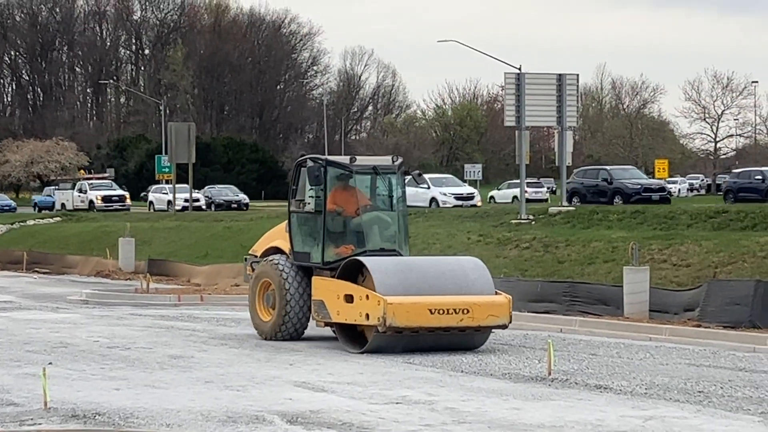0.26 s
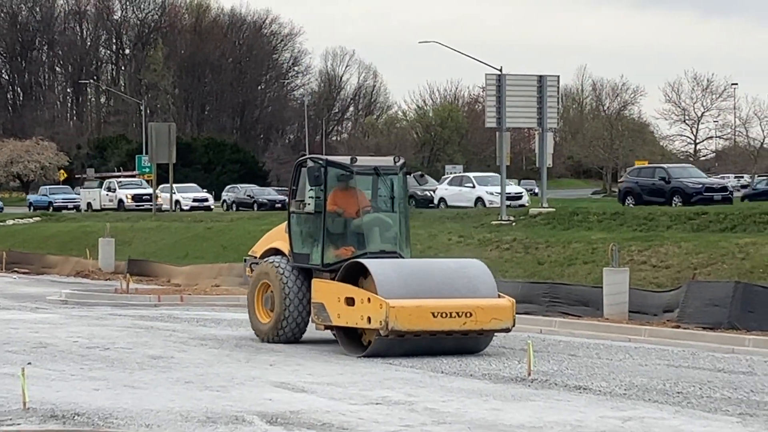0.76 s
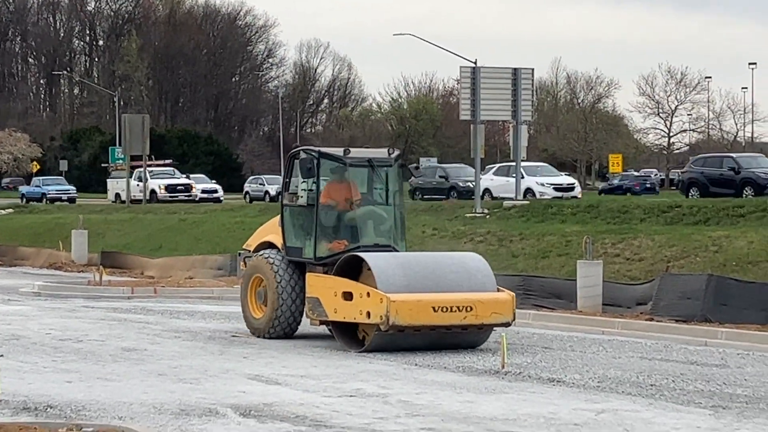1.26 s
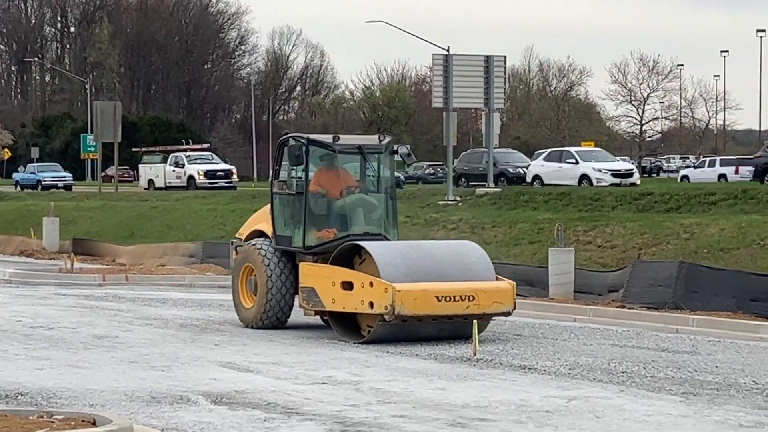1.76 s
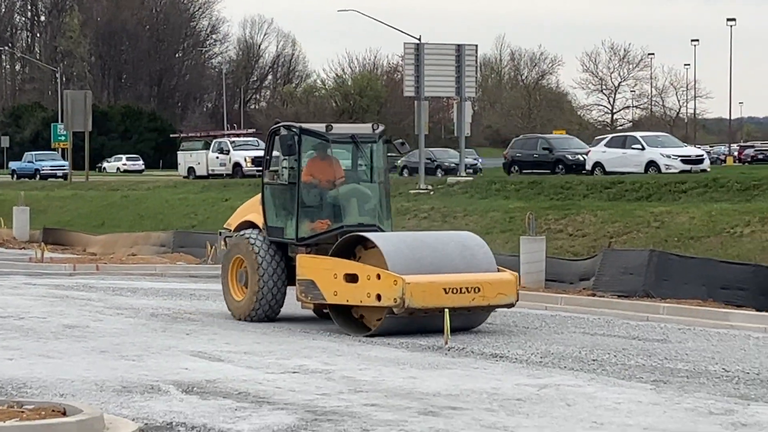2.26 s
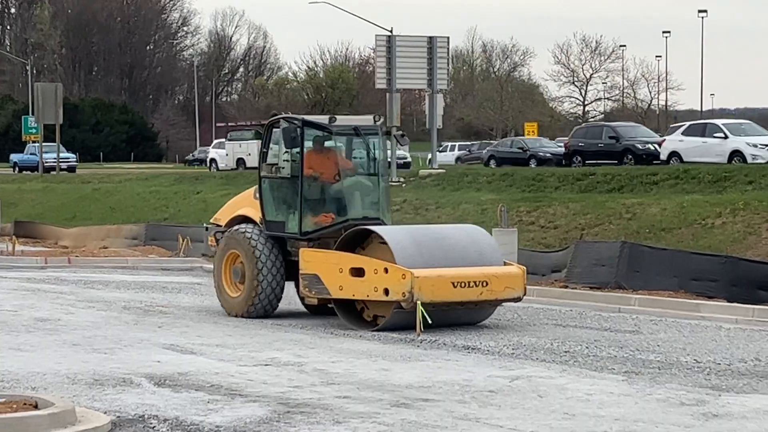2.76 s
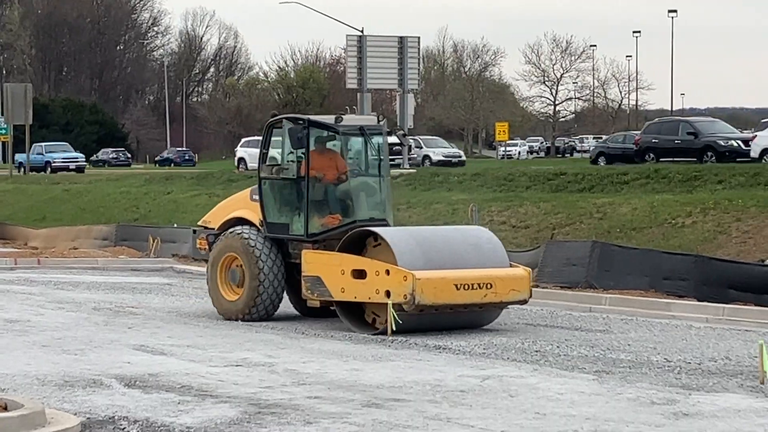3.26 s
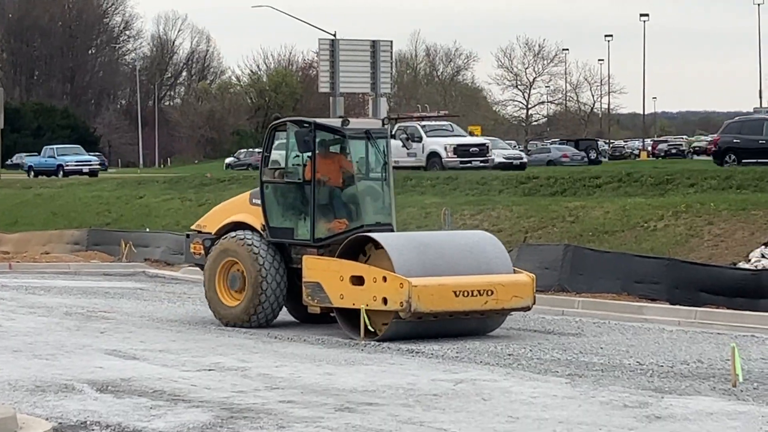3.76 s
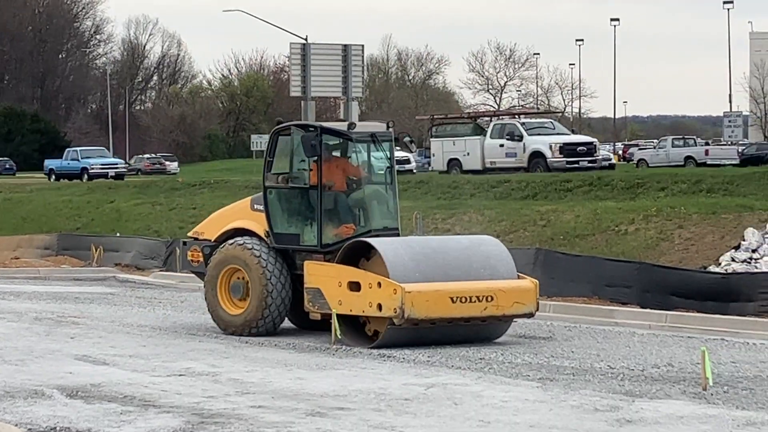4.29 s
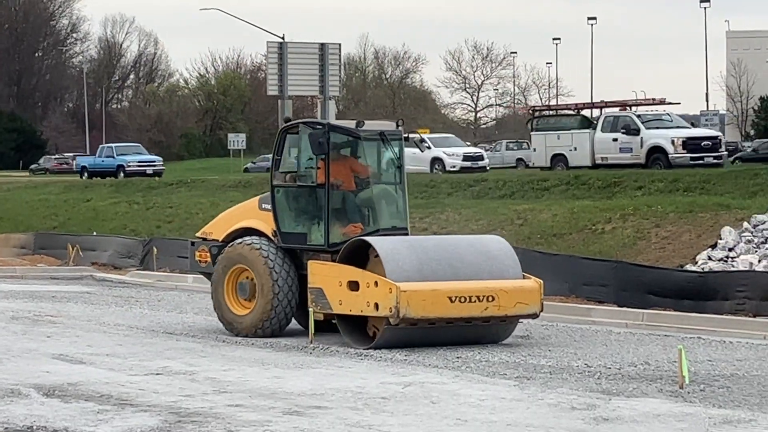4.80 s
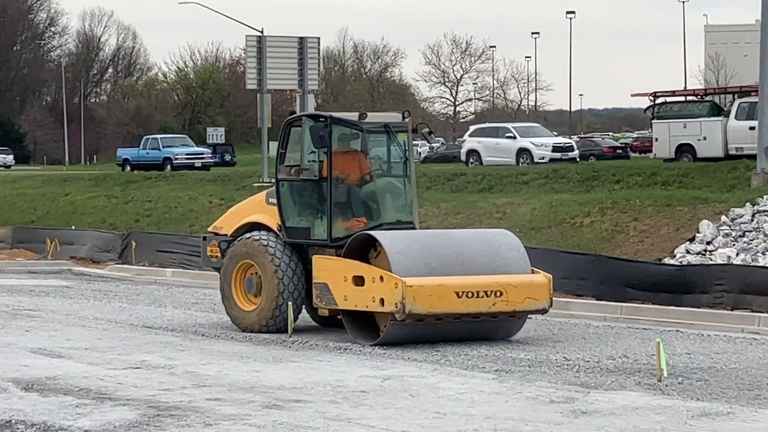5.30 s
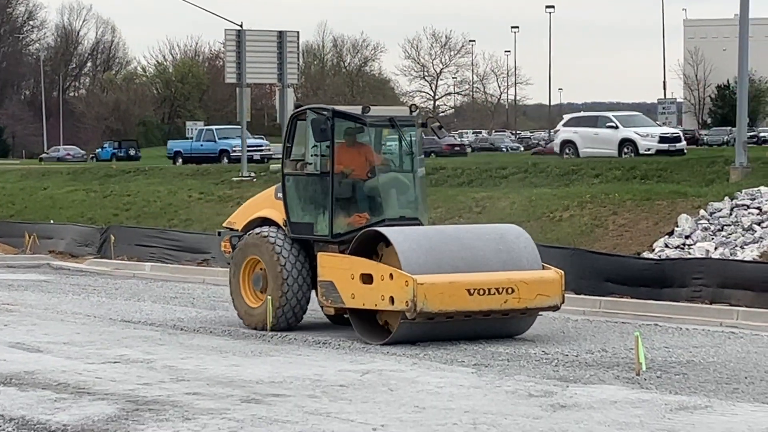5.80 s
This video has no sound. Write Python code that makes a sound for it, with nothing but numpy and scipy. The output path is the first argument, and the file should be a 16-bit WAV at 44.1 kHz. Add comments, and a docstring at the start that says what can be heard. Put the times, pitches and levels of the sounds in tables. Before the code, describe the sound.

A heavy road roller's diesel engine throbs and drones with a growing whine as its drum crunches slowly over gravel beside low traffic rumble.

```python
"""Vibrating road roller on gravel

A road roller creeps closer across an open site with traffic behind it. Sines at geared multiples of one
shaft speed make its vibrator, pump and gears; shaped noise makes rumble, roar and crushed gravel.
Struck resonances make panel rattle and engine pings; short noise bursts make cracking stones.
Two close microphone ports hear it with a phase shift between them."""
import sys
import numpy as np
from scipy import signal
from scipy.fft import rfft, irfft, next_fast_len
from scipy.io import wavfile
from scipy.ndimage import uniform_filter1d

SR = 44100
rng = np.random.default_rng(int(sys.argv[2]) if len(sys.argv) > 2 else 0)


def int16_out(signal):
    """Quantize to a 16-bit WAV file."""
    q = np.round(np.clip(np.atleast_2d(signal).T, -1, 1) * 32767)
    wavfile.write(sys.argv[1], SR, q.astype(np.int16))


N = 266364
T_S = np.arange(N) / SR
SIZE = next_fast_len(N)
HZ = np.maximum(np.arange(SIZE // 2 + 1) * SR / SIZE, 1)

# engine block and fan spectrum: f/Hz, relative density/dB
ENGINE_COLOUR = [(250, -3), (340, -2), (468, 1.5), (516, 0.5), (691, -1.5), (804, -1), (1080, -3),
                 (1320, -6.5), (1460, -6), (1770, -10.5), (2230, -16), (2480, -11.5), (4000, -25),
                 (5200, -31.5), (8800, -100)]


def from_db(db):
    """Decibels to gain."""
    return 10 ** (np.asarray(db) / 20)


def rms_one(x):
    """Scale to unit rms."""
    return x / np.sqrt(np.mean(x ** 2) + 1e-20)


def in_time(rows):
    """Columns of a curve table, one value per sample."""
    s, *columns = np.transpose(rows)
    return [np.interp(T_S, s, c) for c in columns]


def at_hz(points):
    """A spectrum table read at every bin, linear in log frequency."""
    hz, value = np.transpose(points)
    return np.interp(np.log(HZ), np.log(np.maximum(hz, 1)), value)


def drift(rate_hz):
    """Slow random signal of unit rms: noise through a double pole at rate_hz."""
    step = 40   # samples per slow value
    r = np.exp(-2 * np.pi * rate_hz * step / SR)
    noise = rng.standard_normal(N // step + 2002)
    slow = signal.lfilter([1], [1, -2 * r, r * r], noise)[2000:]   # settled part
    return np.interp(np.arange(N) / step, np.arange(len(slow)), rms_one(slow))


def tone(hz, level_db, waver_db, wander_rad, flutter_db=1.35):
    """A sine of rms level_db before its slow waver and quicker flutter; its phase wanders too."""
    phase = 2 * np.pi * (np.cumsum(hz) / SR + rng.random())
    phase += wander_rad * (drift(2.68) + 0.25 * drift(12.6))
    strength_db = level_db + waver_db * drift(3.4) + flutter_db * drift(24.5)
    return np.sqrt(2) * from_db(strength_db) * np.sin(phase)


def coloured(source, colour_db, patchy_db):
    """Colour three rows (common, left, right); each octave swells on its own and partly together."""
    spectrum, out, together = rfft(source, SIZE) * from_db(colour_db), 0, drift(0.35)
    for octave in range(5, 15):
        share = np.clip(1 - abs(np.log2(HZ) - octave), 0, 1)
        if np.max(colour_db[share > 0]) > np.max(colour_db) - 50:   # skip the weakest octaves
            band = irfft(spectrum * share, SIZE)[:, :N]
            out = out + band * from_db(patchy_db * (0.51 * together + drift(11.8)))
    return rms_one(out)


def nearness():
    """0 when far, rising to 1 as the roller draws near, then held."""
    closing_s = 5.2
    return np.clip(T_S / closing_s, 0, 1)


def drive_whine():
    """The drive whines at a fixed multiple of crank speed; returns it and the crank turns per second."""
    whine_per_turn = 7.83
    # whine, mostly growing as the roller turns toward the listener: t/s, f/Hz, level/dB
    shaft = [(0, 307.8, -37.5), (.8, 306.8, -35), (1.4, 306.7, -38), (2.2, 307.1, -36.5),
             (2.55, 306.7, -40), (2.85, 307.4, -34.5), (3.6, 308, -31), (4.05, 307.1, -27.5),
             (4.4, 308.3, -30), (4.8, 303.8, -30), (5.3, 304.8, -30), (5.8, 308.4, -33.5),
             (6.04, 308.2, -30)]
    whine_hz, whine_db = in_time(shaft)
    whine = tone(whine_hz, whine_db, waver_db=.3, wander_rad=.1, flutter_db=.5)
    return whine, whine_hz / whine_per_turn


def low_notes(turns_hz):
    """Throb and vibrator hum follow the crank; the exhaust note holds a fixed firing pitch."""
    firing_hz = 79   # four cylinders: about two firings a turn
    throb_per_turn, hum_per_turn = 1.505, 3.14
    # quick uneven flutter of the low notes: t/s, deep throb level/dB, exhaust level/dB, vibrator hum level/dB
    levels = [(0.0, -34, -44, -39), (0.08, -36, -30, -33.5), (0.57, -36, -32, -29), (0.64, -31, -47, -33.5),
              (0.76, -40, -27, -31.5), (0.94, -35, -47, -29), (1.06, -33, -34, -33.5),
              (1.18, -42, -40, -29.5), (1.63, -29, -41, -26), (2.05, -35, -36, -35), (2.1, -29, -53, -46),
              (2.17, -41, -37, -29.5), (2.25, -33, -47, -40.5), (2.56, -44, -37, -52),
              (2.96, -37, -32.5, -29), (3.03, -29, -37, -33), (3.15, -51, -27, -26.5),
              (3.21, -31, -36, -37.5), (3.35, -27, -40, -26.5), (3.41, -46, -37, -37),
              (3.52, -24.5, -29, -32.5), (3.67, -34, -29, -46), (3.82, -47, -29.5, -32.5),
              (5.0, -30, -25, -39), (5.68, -41, -35, -38), (6.04, -37, -41, -27)]
    throb_db, firing_db, hum_db = in_time(levels)
    out = tone(np.full(N, firing_hz), firing_db, waver_db=0.0, wander_rad=0.44, flutter_db=0.5)
    out += tone(throb_per_turn * turns_hz, throb_db, waver_db=0.5, wander_rad=0.31)
    out += tone(hum_per_turn * turns_hz, hum_db, waver_db=.6, wander_rad=.7, flutter_db=3.0)
    return out


def traffic_drone():
    """A low wavering sine dies away steadily and beats against the exhaust note."""
    drone_hz, start_db, fade_db_per_s = 73.6, -32.5, 3
    return tone(np.full(N, drone_hz), start_db - fade_db_per_s * T_S, waver_db=0.0, wander_rad=1.47)


def geared_tones(turns_hz):
    """Growl, hydraulic pump and gear mesh are fixed multiples of crank speed that come and go."""
    pump_per_turn = 18.04
    # t/s, growl level/dB, pump level/dB, pump overtone level/dB, gear mesh level/dB, ninth order level/dB
    levels = [(0, -46, -42, -57, -53, -64), (.35, -60, -45.5, -54, -56, -59),
              (.8, -44, -48, -50, -51.5, -54), (1.2, -45.5, -44.5, -60, -54, -53),
              (1.7, -43.5, -46.5, -54, -50, -54), (2.3, -50, -50, -50, -55, -56),
              (2.55, -46, -44, -51, -59, -38), (2.8, -47, -40.5, -50, -57, -48),
              (3.0, -51, -57, -54, -54, -56), (3.35, -43, -54, -55, -58, -47),
              (3.8, -61, -55, -52, -58, -50), (4.0, -47, -49, -46, -59, -60),
              (4.18, -40, -49, -44, -53, -51), (4.35, -39, -39.5, -49, -48, -43),
              (4.6, -42.5, -47, -40, -55, -58), (4.85, -35, -38, -45, -57, -45),
              (5.1, -45, -53, -44, -48, -47), (5.4, -59, -58, -47, -49, -46),
              (5.6, -41.5, -53, -55, -51, -45), (6.04, -48, -39, -56, -53, -43)]
    growl_db, pump_db, overtone_db, mesh_db, ninth_db = in_time(levels)
    growl = tone(11.93 * turns_hz, growl_db, waver_db=1.5, wander_rad=2.2)
    out = growl * (.6 + .8 * drift(15))   # broken up
    out += tone(pump_per_turn * turns_hz, pump_db, waver_db=.6, wander_rad=.55, flutter_db=2)
    out += tone(2 * pump_per_turn * turns_hz, overtone_db, waver_db=-0.1, wander_rad=1.2, flutter_db=2.0)
    out += tone(38.75 * turns_hz, mesh_db, waver_db=1.5, wander_rad=2.94, flutter_db=3.5)
    out += tone(9.0 * turns_hz, ninth_db, waver_db=3.0, wander_rad=1.26)
    return out


def weak_orders(turns_hz, near):
    """Weaker multiples of crank speed, slightly louder on coming near."""
    near_gain_db = 2
    # cycles per turn, far level/dB, phase wander/rad
    orders = [(1.11, -68, 1.3), (3.593, -47.5, 1.45), (3.91, -44.5, 0.72), (4.37, -47.5, 1.43),
              (5.028, -44.5, 1.55), (5.9, -45.5, 2.22), (6.92, -50, 1.35), (10.31, -50, 1.88),
              (53.3, -66.5, 3.3)]
    return sum(tone(k * turns_hz, far_db + near_gain_db * near, waver_db=2.0, wander_rad=wander_rad)
               for k, far_db, wander_rad in orders)


def travel_whirr():
    """The travel drive's gears whirr: a sine roughened into sidebands by fast random gain."""
    # t/s, f/Hz, level/dB
    course = [(0, 2500, -64), (.7, 2470, -72), (1.3, 2465, -69), (1.7, 2474, -56.5), (2.2, 2470, -57),
              (2.65, 2470, -57), (3.2, 2505, -63), (3.85, 2465, -61), (4.05, 2482, -52), (4.5, 2450, -66),
              (4.9, 2450, -52), (5.1, 2458, -57), (5.35, 2443, -49), (5.6, 2450, -61), (6.04, 2465, -66)]
    hz, level_db = in_time(course)
    return tone(hz, level_db, waver_db=1.0, wander_rad=3.47, flutter_db=2) * (.5 + .85 * drift(70))


def turbo_whistle():
    """The turbocharger whistles faintly: a high sine with a wide phase wander."""
    # t/s, f/Hz, level/dB
    course = [(0, 11650, -85), (1.0, 11850, -81), (1.7, 12100, -81), (3.0, 12000, -88), (3.8, 11700, -81),
              (4.7, 12000, -80), (5.2, 12550, -76), (6.04, 12200, -79)]
    hz, level_db = in_time(course)
    return tone(hz, level_db, waver_db=3, wander_rad=30)


def rumble(level_db, near):
    """Ground, exhaust and traffic noise throbs unevenly; its upper part grows on coming near."""
    upper_far_db, upper_gain_db = -5, 7   # tyres and ground, against the deep part
    surge_rms_db, surges_hz = 1.4, 14.5
    # f/Hz, relative density/dB
    colour = [(25, -41), (42, 1), (60, -2), (92, 0), (134, -4), (177, -6), (258, -7.5), (300, -4.5),
              (320, -12), (365, -24.5), (450, -16.5), (580, -49), (990, -120)]
    noise = from_db(level_db) * coloured(rng.standard_normal((3, N)), at_hz(colour), patchy_db=.6)
    deep = signal.sosfiltfilt(signal.butter(2, 130, fs=SR, output="sos"), noise)
    upper = from_db(upper_far_db + upper_gain_db * near) * (noise - deep)
    surge = np.sqrt(2) * np.sin(2 * np.pi * surges_hz * T_S + 1.2 * drift(4))
    return from_db(surge_rms_db * surge) * (deep + upper)


def roar(turns_hz, level_db):
    """Combustion clatter and fan noise: each firing adds a short knock of uneven strength."""
    # bonnet resonances and ground-echo dips: f/Hz, 1/e half width/Hz, level/dB
    body = [(410, 51, 5.5), (1088, 24, 3.5), (1457, 59, 1.5), (1837, 112, -5.5), (1948, 120, 4.5),
            (2240, 65, -6.5), (2530, 110, -0.5), (2657, 240, -5), (773, 40, -2), (437, 20.5, -3.5),
            (1360, 26, -1)]
    cycle = 2 * np.cumsum(turns_hz) / SR   # two firings a turn
    strength = from_db(6 * rng.standard_normal(int(cycle[-1]) + 1))[cycle.astype(int)]
    firing = 1 + .22 * strength * np.exp(-4 * (cycle % 1))
    body_db = sum(db * np.exp(-((HZ - hz) / width_hz) ** 2) for hz, width_hz, db in body)
    noise = firing * rng.standard_normal((3, N))
    return from_db(level_db) * coloured(noise, at_hz(ENGINE_COLOUR) + body_db, patchy_db=0.87)


def resonator(hz, t60_s):
    """Feedback coefficients of a two-pole mode."""
    r = from_db(-60 / (t60_s * SR))
    return [1, -2 * r * np.cos(2 * np.pi * hz / SR), r * r]


def pings(level_db):
    """Small engine parts ring: sparse taps dealt to many modes over the engine's clatter range."""
    taps_per_s, t60_s = 220, .12
    pitches_hz = np.geomspace(520, 3600, 40) * rng.uniform(.98, 1.02, 40)
    taps = rng.standard_normal(N) * (rng.random(N) < taps_per_s / SR)
    dealt, out = rng.integers(0, len(pitches_hz), N), 0
    for k, hz in enumerate(pitches_hz):
        # density per Hz to level per log-spaced mode
        mode_db = np.interp(hz, HZ, at_hz(ENGINE_COLOUR)) + 10 * np.log10(hz)
        soft = uniform_filter1d(taps * (dealt == k), size=9) + 1e-18
        out = out + from_db(mode_db) * rms_one(signal.lfilter([0, 1], resonator(hz, t60_s), soft))
    return from_db(level_db) * rms_one(out)


def rattle(swell_db):
    """Valve gear and panels rattle: bunched uneven taps and harder jolts ring a set of modes."""
    # f/Hz, rms level before the swell/dB, t60/s
    panels = [(607.5, -52, 0.11), (932, -49.5, 0.17), (1055, -56.5, 0.12), (1097, -50.5, 0.12),
              (1180, -56, 0.086), (1557, -61.5, 0.085), (1650, -59.5, 0.095), (1972, -63, 0.09),
              (2110, -63.5, 0.09), (2330, -65, .09), (2810, -65, 0.11), (3284, -63.5, 0.07)]
    # jolts: t/s, level over a usual tap/dB
    jolts = [(1.6, 12), (1.636, 11), (4.657, 11), (4.705, 6), (5.095, 13), (5.12, 11)]
    out, taps = np.zeros(N), rng.random(N) < 90 * from_db(3.0 * drift(8)) / SR
    knocks = np.zeros(N)
    for s, over_db in jolts:
        knocks[round(s * SR)] = from_db(over_db)
    for hz, level_db, t60_s in panels:
        clicks = (taps * rng.standard_normal(N) + knocks) * from_db(1.7 * drift(2.6)) + 1e-18
        ring = signal.lfilter([0, np.sin(2 * np.pi * hz / SR)], resonator(hz, t60_s), clicks)
        out += from_db(level_db) * rms_one(ring)
    return from_db(swell_db) * out


def gravel(near):
    """Crushed stones crackle densely over a hiss; the air dulls the top less when the drum is near."""
    far_db, gain_db = -53.5, 0.5
    treble_far_db, treble_gain_db = -10, 11   # top against body
    # f/Hz, relative density/dB
    colour = [(2500, -30), (3600, -2), (4000, -2), (4400, -.5), (5000, -3), (6000, -5.5), (7200, -8),
              (8600, -7), (9500, -9), (10500, -8), (12500, -11), (13200, -15), (16000, -16)]
    sizes = from_db(2.9 * np.minimum(rng.exponential(1, (3, N)), 4.8)) * rng.choice([-1, 1], (3, N))
    crackle = rms_one(sizes * (rng.random((3, N)) < 2500 * from_db(1.0 * drift(12)) / SR))
    grit = coloured(rng.standard_normal((3, N)) + .4 * crackle, at_hz(colour), patchy_db=.75)
    dull = signal.sosfiltfilt(signal.butter(1, 7000, fs=SR, output="sos"), grit)
    treble = from_db(treble_far_db + treble_gain_db * near) * (grit - dull)
    return from_db(far_db + gain_db * near) * (dull + treble)


def stones():
    """Single stones crack: each a short decaying burst of noise banded around its own pitch."""
    length_s, decay_s = 0.025, 0.02
    # t/s, level at onset/dB, f/Hz
    cracks = [(0.833, -58, 6390), (0.8513, -54, 6480), (0.8654, -55, 7500), (0.8814, -53, 6850),
              (0.9094, -57, 8000), (1.4195, -58, 11300), (1.5184, -57, 11800), (1.6466, -54, 6500),
              (1.998, -60, 9500), (3.7792, -58, 7480), (5.0693, -52, 8014)]
    out, t = np.zeros(N), np.arange(round(length_s * SR)) / SR
    grit = rng.standard_normal((len(cracks), len(t)))
    for (s, onset_db, hz), noise in zip(cracks, grit):
        band = signal.butter(2, [hz / 1.35, hz * 1.3], "band", fs=SR, output="sos")
        burst = rms_one(signal.sosfilt(band, noise)) * np.exp(-t / decay_s)
        at = round(s * SR)
        out[at:at + len(t)] += from_db(onset_db) * burst
    return out


def moans():
    """Brief low notes: slightly wavering sines under bell-shaped swells."""
    # t/s, f/Hz, level at the top of the swell/dB, 1/e half length/s
    notes = [(2.55, 168, -34, 0.12), (3.335, 470, -35.5, 0.035), (4.95, 231, -34, .1),
             (5.32, 241.5, -31, 0.062), (5.7, 270, -31, 0.098)]
    return sum(np.exp(-((T_S - s) / half_s) ** 2) * tone(np.full(N, hz), db, waver_db=1.5, wander_rad=0.46)
               for s, hz, db, half_s in notes)


def passer():
    """An exhaust note on the road fades in as its vehicle comes out from behind the roller."""
    start_s, rise_s, note_hz, level_db = 5.36, 0.085, 115.8, -27.5
    fade = np.clip((T_S - start_s) / rise_s, 0, 1)
    return fade * tone(np.full(N, note_hz), level_db, waver_db=1, wander_rad=.6, flutter_db=2.5)


def ports(common, left, right):
    """Stereo likeness by frequency: a shared part with a phase shift, plus a part independent left and right."""
    # f/Hz, phase by which left leads/rad
    port_phase = [(0, 0), (1550, 0), (1890, -.6), (2240, 0), (3300, 1.2), (4050, 2.4), (4700, 2.4),
                  (5400, 2.9), (6050, 3.0), (6720, .6), (8440, -2.8), (9400, -3.3), (11300, -6.3),
                  (12000, -6.5), (13000, -9.3), (14200, -9.5), (15300, -12.5), (16700, -12.7)]
    # f/Hz, left minus right/dB
    port_balance = [(380, 0), (700, 1), (1290, 2.5), (2380, 1), (4400, -.8), (5700, -1.4), (7000, 1),
                    (8100, -.3), (15000, 0)]
    # stereo likeness: f/Hz, squared gain of the shared part (the independent part takes the rest)
    stereo_likeness = [(60, .94), (350, .94), (520, .82), (860, .62), (1550, .68), (1900, .45), (2300, .76),
                       (5700, .82), (6400, .5), (7800, .65), (9200, .95), (10200, .65), (11400, .95),
                       (12400, .55), (13700, .95), (14700, .4), (15500, .95)]
    likeness = np.clip(at_hz(stereo_likeness), 0, 1)
    hz, lead_rad = np.transpose(port_phase)
    # half of each offset per port
    turn = np.exp(.5j * np.interp(HZ, hz, lead_rad)) * from_db(at_hz(port_balance) / 2)
    shared = rfft(common, SIZE) * np.sqrt(likeness)
    own = rfft([left, right], SIZE) * np.sqrt(1 - likeness)
    return irfft([(shared + own[0]) * turn, (shared + own[1]) / turn], SIZE)[:, :N]


def scene():
    """Tones, rings and cracks are shared by both ports; the noises also have independent left and right parts."""
    pings_db, fade_s = -6, .004   # pings against the roar; fade at both ends
    # broad sound: t/s, rumble level before its surge and upper gain/dB, roar level/dB
    load = [(0, -26, -34.5), (.8, -26, -35), (1.6, -26.5, -35.5), (2.3, -27, -35.5), (3.3, -27, -34),
            (4.1, -27, -34.5), (5.0, -27.5, -33), (5.6, -30, -33.5), (6.04, -29.5, -34)]
    rumble_db, roar_db = in_time(load)
    near = nearness()
    whine, turns_hz = drive_whine()
    tones = whine + low_notes(turns_hz) + traffic_drone() + geared_tones(turns_hz)
    tones += weak_orders(turns_hz, near) + travel_whirr() + turbo_whistle()
    common, left, right = rumble(rumble_db, near) + roar(turns_hz, roar_db) + gravel(near)
    common = common + tones + pings(roar_db + pings_db) + rattle(roar_db - np.mean(roar_db))
    common = common + stones() + moans() + passer()
    fade = np.clip(np.minimum(T_S, T_S[::-1]) / fade_s, 0, 1)
    return ports(fade * common, fade * left, fade * right)


def record(dry):
    """The microphones lose the deepest bass; the top is cut steeply."""
    cutoff_hz = 15750
    lean = signal.sosfilt(signal.butter(3, 36, "high", fs=SR, output="sos"), dry)
    return signal.sosfilt(signal.ellip(14, .5, 70, cutoff_hz, fs=SR, output="sos"), lean)


dry = scene()
out = record(dry)
int16_out(out)
```